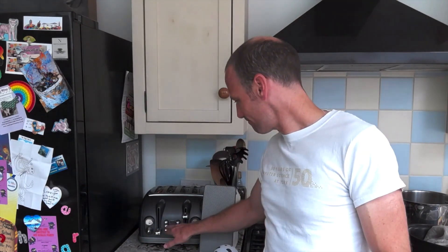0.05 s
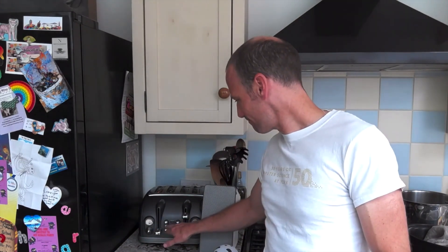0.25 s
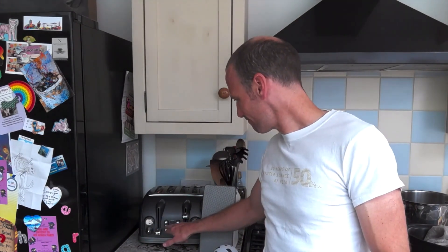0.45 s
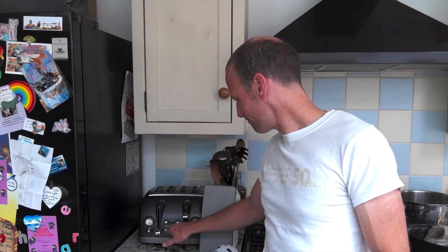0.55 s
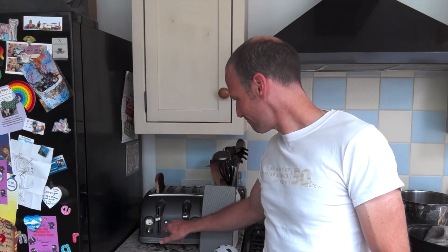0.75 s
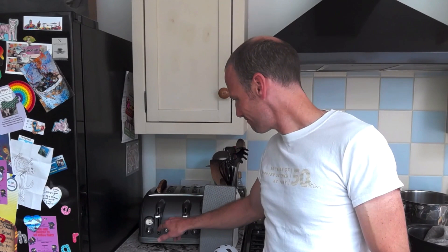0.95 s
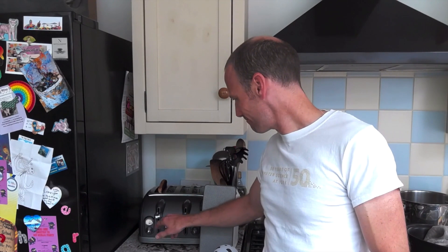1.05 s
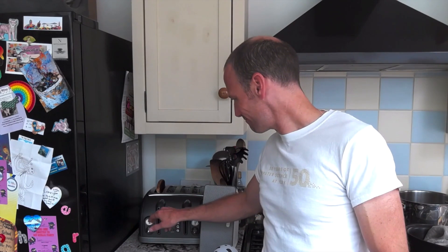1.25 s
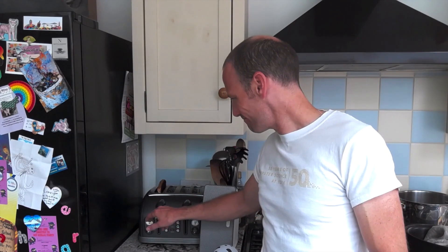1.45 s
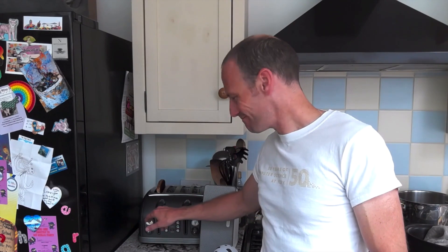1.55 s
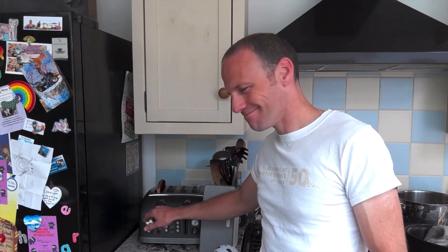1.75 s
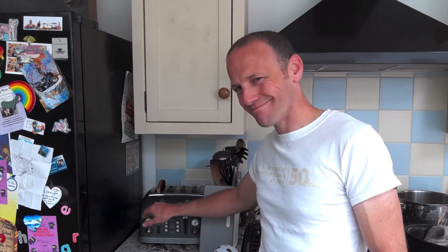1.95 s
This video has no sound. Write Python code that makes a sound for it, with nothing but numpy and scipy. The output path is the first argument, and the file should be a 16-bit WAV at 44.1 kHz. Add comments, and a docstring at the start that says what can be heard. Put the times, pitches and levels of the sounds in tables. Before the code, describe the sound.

A toaster lever is pushed down in a small tiled kitchen. Very faint finger ticks on plastic precede a click at 0.5 s. The metal carriage jerks free, scrapes and knocks at about 0.54, 0.64 and 0.7 s, then latches with a clattering clunk at 0.8 s. Sheet metal rings and short echoes fade; a low hum lingers weakly. Quiet rumble and hiss continue, with a barely audible tick near 1.9 s.

```python
"""Small tiled kitchen, toaster on the worktop. First fingers tick on the plastic lever knob; near 0.5 s the carriage
jerks free, scrapes down its guide, knocks twice and latches. Each blow is shaped noise with a sine ping, and sines
ring for the sheet-metal case and worktop. A low sine hum booms and lingers, and a late faint tick follows.
Decaying noise makes the tiled echo; rumble and microphone hiss run throughout."""
import sys
import numpy as np
from scipy import signal
from scipy.fft import rfft, irfft, next_fast_len
from scipy.io import wavfile
from scipy.ndimage import uniform_filter1d, map_coordinates

SR = 44100
rng = np.random.default_rng(int(sys.argv[2]) if len(sys.argv) > 2 else 0)


def file_out(sig):
    """Save sig as 16-bit WAV at sys.argv[1]."""
    # one column per channel
    cols = np.atleast_2d(sig).T
    # limit, then scale
    lim = np.clip(cols, -1, 1)
    pcm = np.round(lim * 32767).astype(np.int16)
    wavfile.write(sys.argv[1], SR, pcm)


N = 88817
T = np.arange(N) / SR  # time, s


def amp(db):
    """dB to gain."""
    return 10 ** (np.asarray(db) / 20)


def unit(x):
    """Scaled to rms 1."""
    return x / np.sqrt(np.mean(x ** 2) + 1e-20)


def along(points, hz):
    """Read (Hz, value) points on a log frequency axis."""
    point_hz, value = np.transpose(points)
    return np.interp(np.log(hz + 1), np.log(point_hz + 1), value)


def filtered(x, response):
    """x with its spectrum multiplied by a response of frequency."""
    size = next_fast_len(len(x) + 8192)  # padded so that the end does not wrap round
    spectrum = rfft(x, size) * response(np.fft.rfftfreq(size, 1 / SR))
    return irfft(spectrum, size)[:len(x)]


def struck(start_s, rise_s, t60_s):
    """Envelope of a blow: a straight rise from start_s, over a decay of 60 dB per t60_s."""
    t = np.maximum(T - start_s, 0)
    return np.minimum(t / rise_s, 1) * amp(-60 * t / t60_s)


def sine(hz, start_s=0, phase=0):
    """Sine whose phase is counted from start_s; phase in radians."""
    return np.sin(2 * np.pi * hz * (T - start_s) + phase)


# carriage blows: start_s, clatter_db, rise_s, clatter_t60_s, ring_db, thump_db, ping_hz, ping_db, ping_t60_s,
# then eight colour_db, one for each frequency of the next table
BLOWS = [(0.5413, -30.5, 0.0067, 0.051, -46, -53, 6520, -37.5, 0.073, -2.5, -7, -5.5, -0.17, -10.5, 0.51, 18, 4),
         (0.6367, -27, 0.003, 0.14, -40, -43.5, 6530, -48, 0.21, -15.5, 1.5, 5.5, 0.49, -2, 0.23, 3.8, 4.5),
         (0.7078, -29.5, 0.0032, 0.15, -44.5, -50, 11000, -37.5, 0.046, -15, -4.5, -10, -4.4, -2, 0.17, 1.3, 5),
         (.7975, -26, 0.0085, 0.18, -42.5, -43.5, 8300, -39, 0.086, 5, -2, -4, -0.39, 0.5, -1, 1.9, 3.5)]
# where the colour of a blow is set: pitch_hz
COLOUR_HZ = [160, 300, 600, 1200, 2500, 6500, 10000, 14500]


def carriage():
    """Each blow clatters and pings, rings the case and thumps the worktop; a scrape runs alongside."""
    clatter = scrape()
    ring = np.zeros(N)
    for start_s, db, rise_s, t60_s, ring_db, thump_db, ping_hz, ping_db, ping_t60_s, *colour_db in BLOWS:
        colour = list(zip(COLOUR_HZ, colour_db))
        burst = grit(lambda hz: amp(along(STEEL, hz) + along(colour, hz)))
        clatter = clatter + amp(db) * struck(start_s, rise_s, t60_s) * burst
        clatter = clatter + amp(ping_db) * struck(start_s, rise_s, ping_t60_s) * sine(ping_hz)
        ring = ring + worktop_thump(start_s, thump_db)
        ring = ring + case_ring(start_s, ring_db, colour)
    return clatter, ring


# carriage scraping on its guide: time_s, level_db
SCRAPE = [(.5, -67), (.535, -61.5), (.55, -38), (.585, -41), (.63, -41.5), (.69, -44.5), (.75, -41.5),
          (.79, -49), (.85, -41), (.9, -46), (.95, -57), (1.0, -92)]


def scrape():
    """Steel dragging on steel: continuous grit that follows a drawn level."""
    level_db = np.interp(T, *np.transpose(SCRAPE), left=-120, right=-120)
    return amp(level_db) * grit(lambda hz: amp(along(STEEL, hz)))


# spectrum of the steel in clatter and scrape: pitch_hz, level_db (per Hz, relative)
STEEL = [(70, -52), (120, -14.5), (300, -6), (600, -4), (880, -7), (2500, -6.5), (4000, -10), (4750, -8.5),
         (5700, -15), (6600, -9), (8000, -15.5), (10600, -18), (12000, -26), (13500, -29.5), (14600, -24),
         (15800, -23)]
GRAINS_PER_S, GRAIN_SPREAD_DB, SMOOTH_SHARE = 6000, 2, 0.8  # share: smooth noise against rms-1 contacts
PATCH_DB = 3  # rms depth of the random patches


def grit(response):
    """Dense tiny metal contacts on smooth noise, in random short patches of louder and softer over pitch and time."""
    happens = rng.random(N) < GRAINS_PER_S / SR
    size = amp(GRAIN_SPREAD_DB * rng.standard_exponential(N))
    contacts = happens * size * rng.standard_normal(N)
    noise = unit(contacts) + SMOOTH_SHARE * rng.standard_normal(N)
    z = signal.stft(noise, nperseg=256)[2]
    # random patches of gain over frequency and time
    patches = uniform_filter1d(rng.standard_normal(z.shape), size=2, axis=0)
    patches = uniform_filter1d(patches, size=5, axis=1)
    patchy = signal.istft(z * amp(PATCH_DB * unit(patches)), nperseg=256)[1][:N]
    return unit(filtered(patchy, response))


# modes of the sheet-metal case: pitch_hz, level_db (relative), t60_s
CASE = [(161.1, -3, 0.48), (208.7, -7.5, 0.26), (301, 1, 0.29), (452, -0.5, 0.47), (594, -32, 2.8),
        (601, 3, 0.51), (633, -2, 0.14), (963.6, 1.5, 0.13), (1022, 2, 0.21), (1127, -8, 0.36),
        (1519, -2, 0.33), (1655, -0.5, 0.195), (2400, 4, 0.13), (2650, 5.5, 0.13), (3080, -4, 0.24),
        (4755, -6, 0.54), (4600, -8.5, 0.37)]
WAVER_RAD, WAVER_PER_S, CASE_RISE_S = 0.35, 30, 0.003  # the loose case rings unsteadily


def case_ring(start_s, ring_db, colour):
    """A blow excites the case modes, each with a slightly random level, a random phase and a wavering phase."""
    ring = np.zeros(N)
    for hz, mode_db, t60_s in CASE:
        luck_db, phase = rng.standard_normal(2)
        waver = WAVER_RAD * map_coordinates(rng.standard_normal(128), [T * WAVER_PER_S], order=1)
        gain = amp(ring_db + mode_db + along(colour, hz) + luck_db)
        ring = ring + gain * struck(start_s, CASE_RISE_S, t60_s) * sine(hz, start_s, phase + waver)
    return ring


THUMP_HZ, THUMP_T60_S, THUMP_RISE_S = 80.9, 0.36, 0.005


def worktop_thump(start_s, thump_db):
    """The worktop answers a blow with one low decaying sine."""
    return amp(thump_db) * struck(start_s, THUMP_RISE_S, THUMP_T60_S) * sine(THUMP_HZ, start_s)


# touches on the plastic knob: start_s, click_db, pitch_hz, t60_s, fizz_db, fizz_width_hz, thud_db
TOUCHES = [(0.056, -70, 2077, 0.19, -64.5, 1520, -95), (.272, -84, 1506, 0.22, -68, 1840, -95),
           (.464, -69, 3720, 0.06, -64, 1800, -90), (0.47, -54, 3730, 0.1, -60, 4500, -90),
           (0.4941, -66, 835, 0.2, -52, 1200, -39), (0.497, -39, 1984, 0.06, -47, 1700, -58),
           (0.502, -40.5, 2151, 0.072, -41.5, 1670, -58), (1.916, -76, 2065, 0.18, -73, 1200, -91)]
KNOB_RISE_S, THUD_RISE_S, THUD_HZ, THUD_T60_S = 0.0013, 0.00043, 313, 0.053


def knob():
    """Short plastic ticks: a pitched click, a band of fizz around it and a dull thud."""
    ticks = np.zeros(N)
    for start_s, click_db, hz, t60_s, fizz_db, width_hz, thud_db in TOUCHES:
        fizz = unit(filtered(rng.standard_normal(N), lambda f: 1 / (1 + ((f - hz) / width_hz) ** 4)))
        tick = amp(click_db) * sine(hz) + amp(fizz_db) * fizz
        ticks = ticks + struck(start_s, KNOB_RISE_S, t60_s) * tick
        ticks = ticks + amp(thud_db) * struck(start_s, THUD_RISE_S, THUD_T60_S) * sine(THUD_HZ, start_s)
    return ticks


# low hum: time_s, level_db (rms), pitch_hz
HUM = [(0.52, -70, 71.8), (0.56, -51.5, 70), (0.58, -50, 69), (0.61, -65, 63.4), (0.63, -55, 60.4),
       (0.68, -41, 58.4), (0.708, -50.5, 62), (0.742, -41.5, 66.9), (0.762, -46, 63.9), (0.786, -77, 63.3),
       (0.816, -43.5, 63.3), (0.84, -34.5, 68), (0.886, -51.5, 65.6), (0.94, -42, 59.3), (1.006, -83, 61.2),
       (1.034, -56.5, 66.6), (1.084, -51, 63.6), (1.108, -62.5, 64.6), (1.208, -50.5, 64.6),
       (1.236, -65, 63.1), (1.274, -53.5, 65.2), (1.562, -67, 64.1), (1.802, -67, 65.8), (1.826, -79, 65.9),
       (1.85, -79, 65), (1.966, -69, 63.7), (2.0, -92, 64.7)]


def hum():
    """A low boom: one sine of drifting pitch that throbs during the blows, then lingers and fades unevenly."""
    time_s, level_db, pitch_hz = np.transpose(HUM)
    level = np.sqrt(2) * amp(np.interp(T, time_s, level_db, left=-120))  # root 2 turns rms into peak
    phase = 2 * np.pi * np.cumsum(np.interp(T, time_s, pitch_hz)) / SR
    return level * np.sin(phase)


# decay of the tiled kitchen: pitch_hz, t60_s
ROOM = [(100, 0.58), (500, 0.47), (2500, 0.38), (4800, .45), (6000, .36), (11000, 0.29), (16000, 0.4)]
ROOM_DB, ROOM_GAP_S = -2, 0.004  # echo level; delay of the echo behind the direct sound
KNOB_WET, CASE_WET = 0.89, 0.27  # shares of the knob, and of the case and worktop, that feed the room


def kitchen(x):
    """Diffuse tail of decaying noise; each frequency dies at its own speed."""
    hz, t, z = signal.stft(rng.standard_normal(SR // 2), SR, nperseg=256)
    decay = amp(-60 * t / along(ROOM, hz)[:, None])
    tail = signal.istft(z * decay, SR, nperseg=256)[1]
    delayed = np.pad(x, (round(ROOM_GAP_S * SR), 0))
    return signal.fftconvolve(delayed, tail / np.linalg.norm(tail))[:N]


# spectrum of rumble and hiss: pitch_hz, level_db (per Hz, relative)
FLOOR = [(12, -44), (20, -2), (55, -3.5), (107, -9), (141, -15.5), (308, -20), (419, -22.5), (469, -20.5),
         (655, -24.5), (1600, -25), (1840, -27), (6650, -33), (15800, -38)]
# level of the rumble over time: time_s, level_db (relative)
RUMBLE = [(0, 1), (.05, 6), (.11, 3), (.13, -4), (.45, -1.5), (2, -1.5)]
FLOOR_DB, RUMBLE_SWING_DB, RUMBLE_TOP_HZ = -66, -1.5, 150  # floor rms before the rumble moves


def floor():
    """Steady microphone hiss over a swaying room rumble, both from one shaped noise."""
    noise = unit(filtered(rng.standard_normal(N), lambda hz: amp(along(FLOOR, hz))))
    rumble = filtered(noise, lambda hz: 1 / (1 + (hz / RUMBLE_TOP_HZ) ** 4))
    hiss = noise - rumble
    sway = map_coordinates(rng.standard_normal(24), [T * 8])  # 8 random points per second
    rumble_db = RUMBLE_SWING_DB * sway + np.interp(T, *np.transpose(RUMBLE))
    return amp(FLOOR_DB) * (hiss + rumble * amp(rumble_db))


def scene():
    """Toaster, its echo in the kitchen, hum and floor."""
    clatter, ring = carriage()
    ticks = knob()
    echo = amp(ROOM_DB) * kitchen(clatter + KNOB_WET * ticks + CASE_WET * ring)
    return (clatter + ring + ticks + echo + hum() + floor())[None]


TOP_HZ = 15830


def record(dry):
    """The microphone's recorder keeps nothing from its band limit upward."""
    return filtered(dry[0], lambda hz: hz < TOP_HZ)[None]


dry = scene()
out = record(dry)
file_out(out)
```